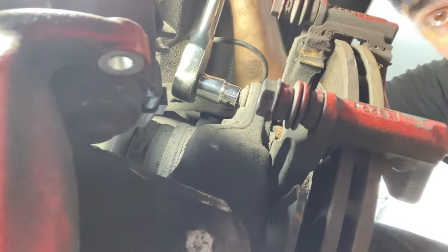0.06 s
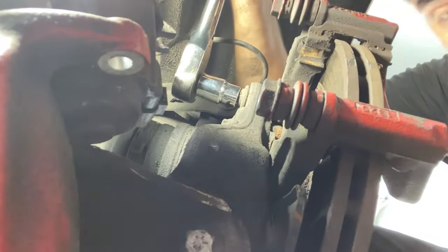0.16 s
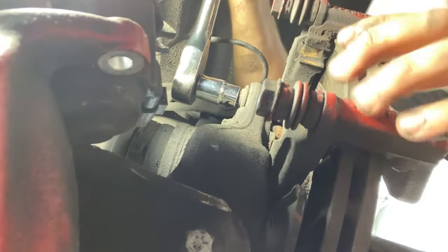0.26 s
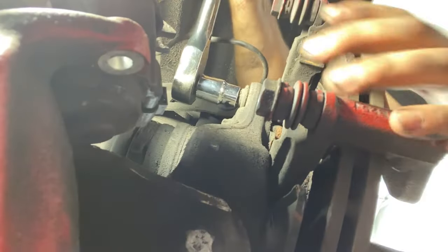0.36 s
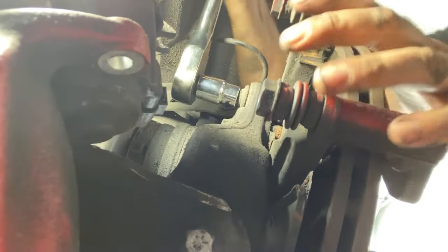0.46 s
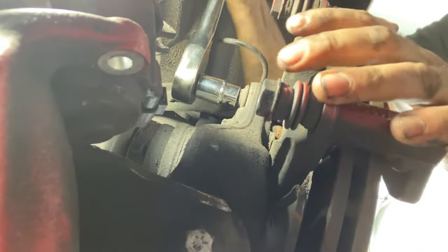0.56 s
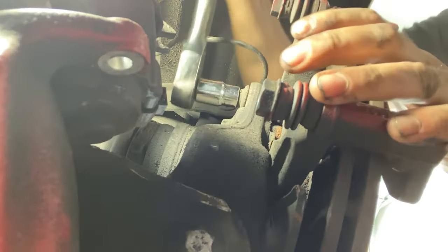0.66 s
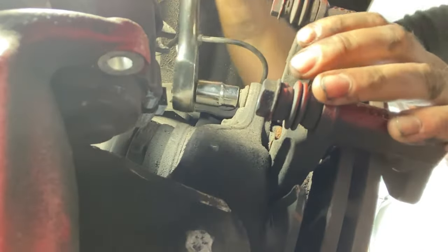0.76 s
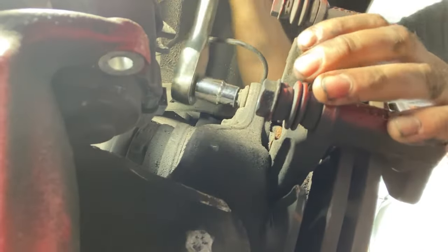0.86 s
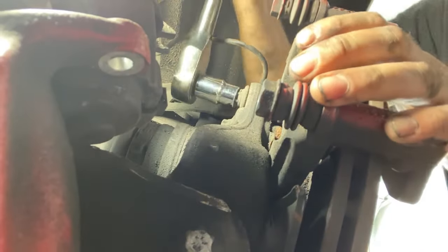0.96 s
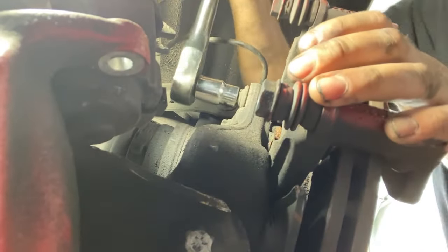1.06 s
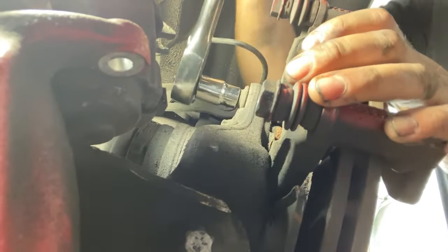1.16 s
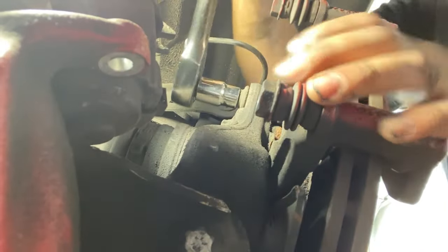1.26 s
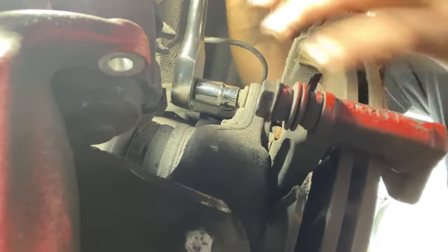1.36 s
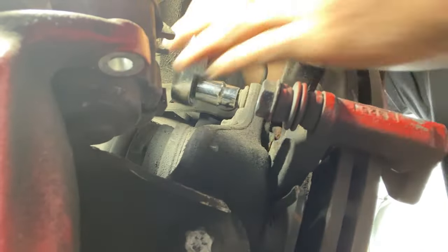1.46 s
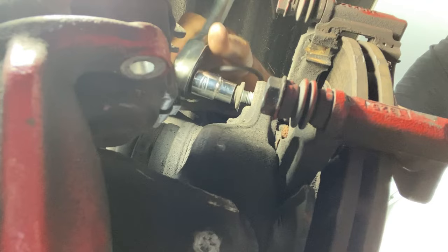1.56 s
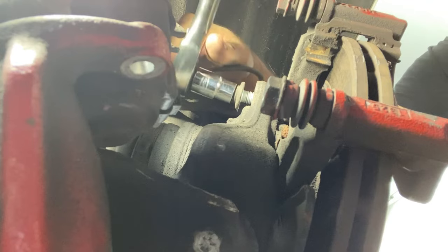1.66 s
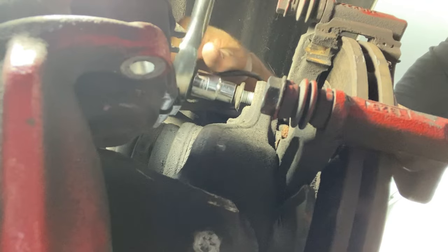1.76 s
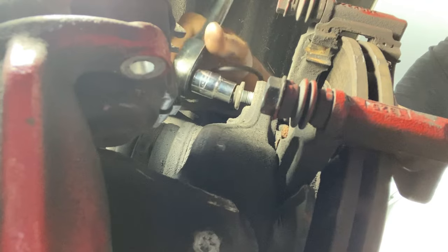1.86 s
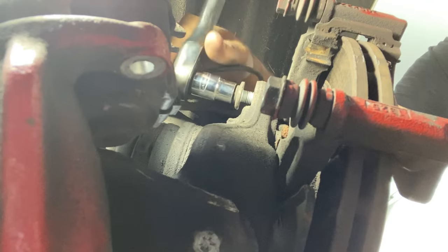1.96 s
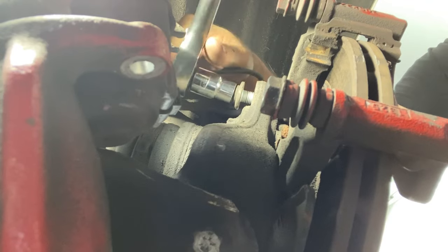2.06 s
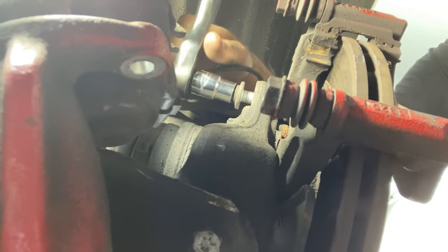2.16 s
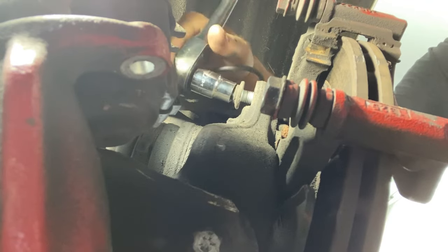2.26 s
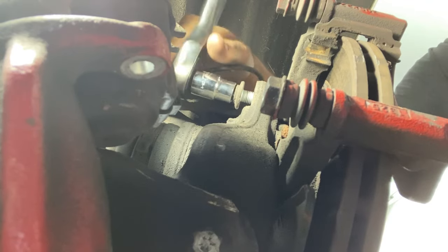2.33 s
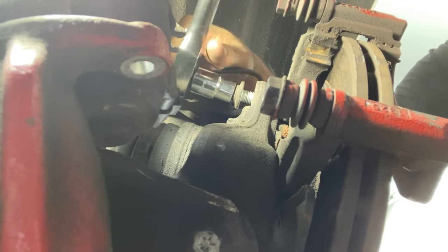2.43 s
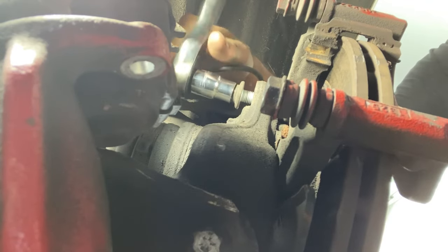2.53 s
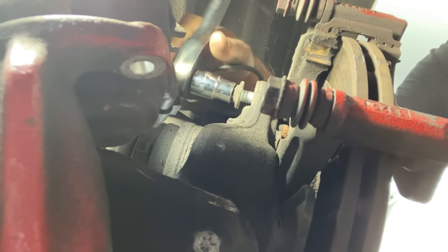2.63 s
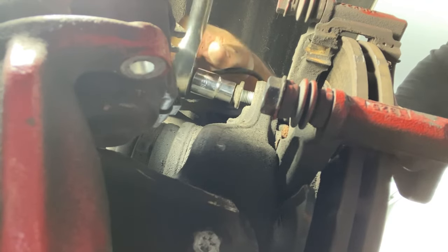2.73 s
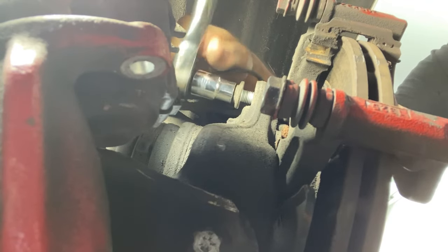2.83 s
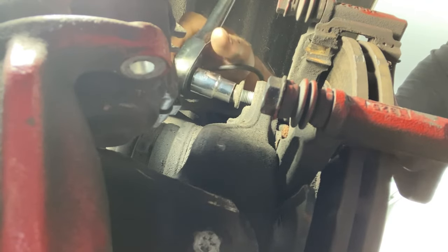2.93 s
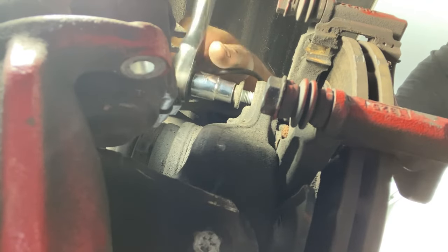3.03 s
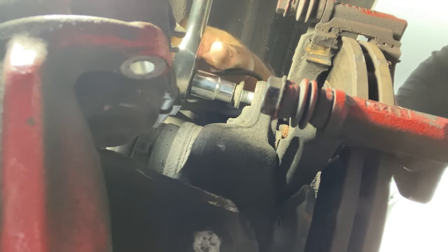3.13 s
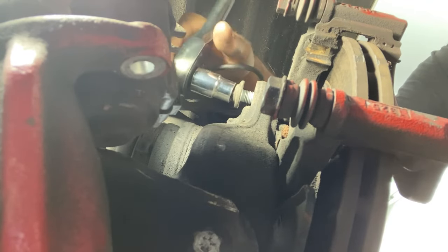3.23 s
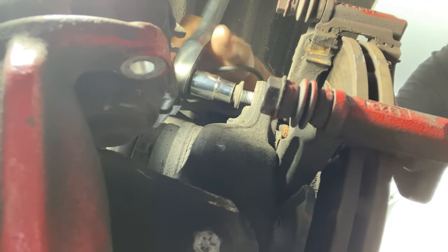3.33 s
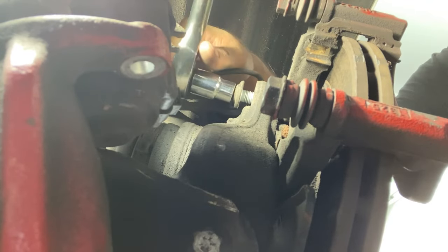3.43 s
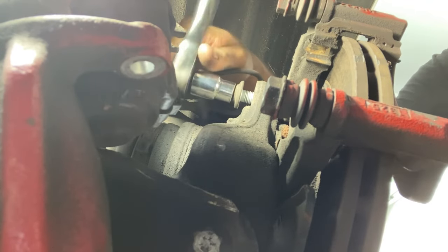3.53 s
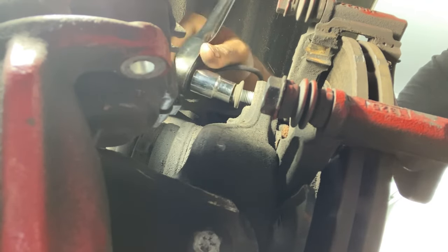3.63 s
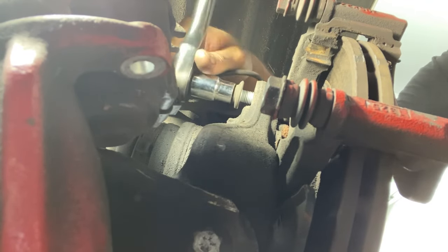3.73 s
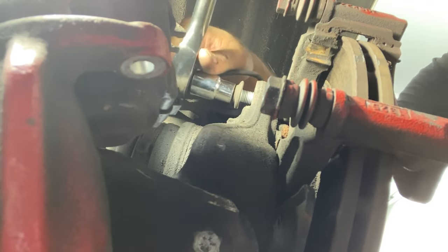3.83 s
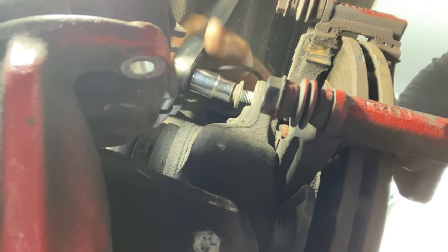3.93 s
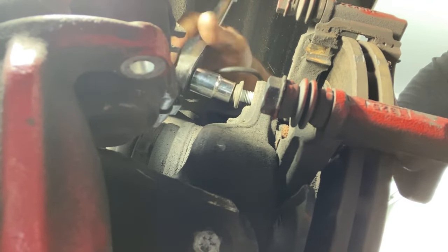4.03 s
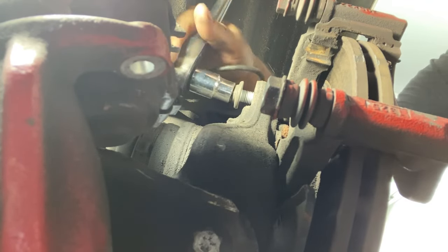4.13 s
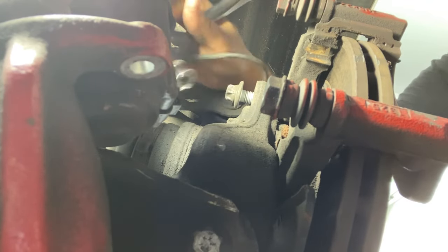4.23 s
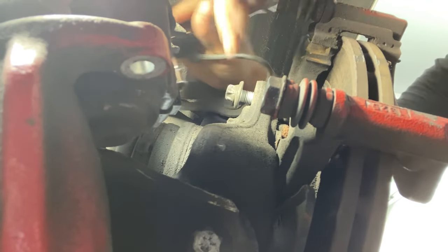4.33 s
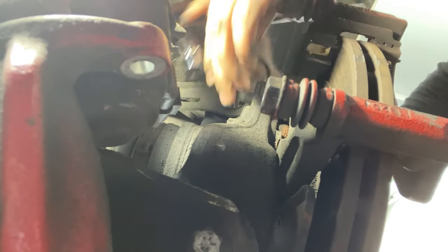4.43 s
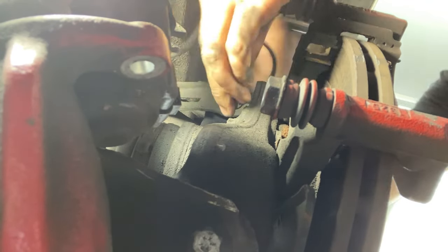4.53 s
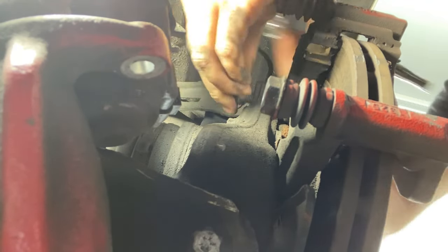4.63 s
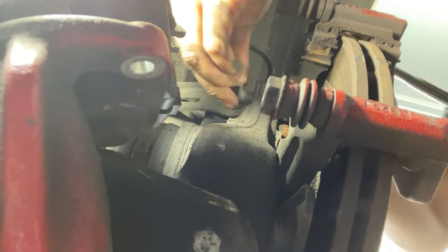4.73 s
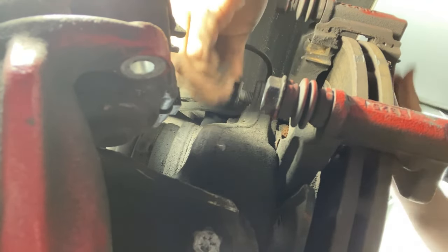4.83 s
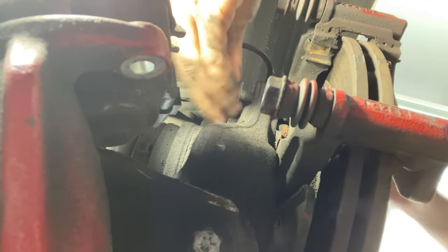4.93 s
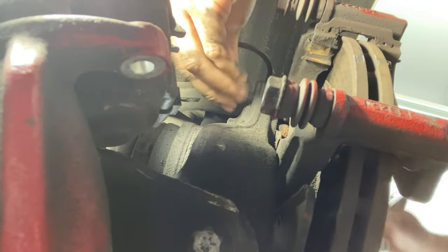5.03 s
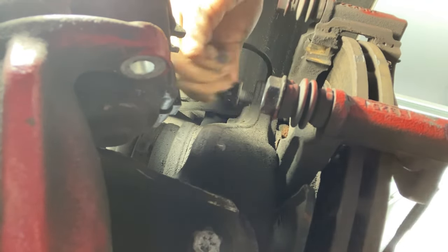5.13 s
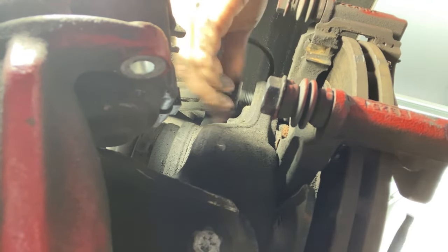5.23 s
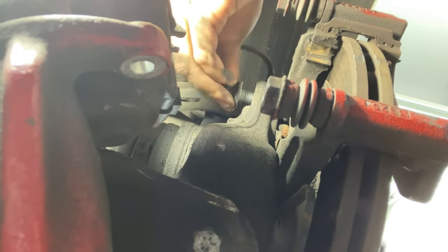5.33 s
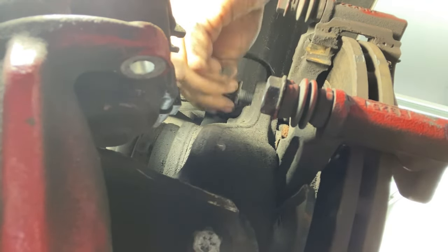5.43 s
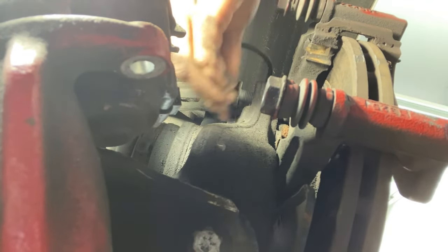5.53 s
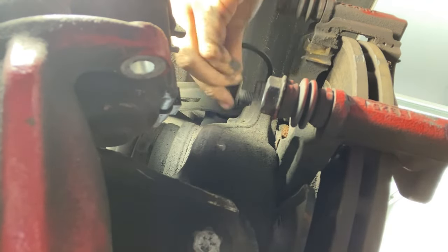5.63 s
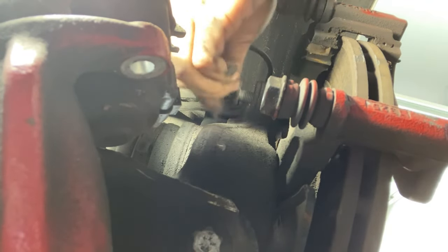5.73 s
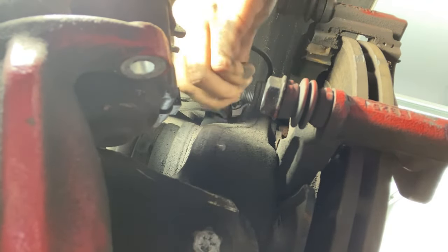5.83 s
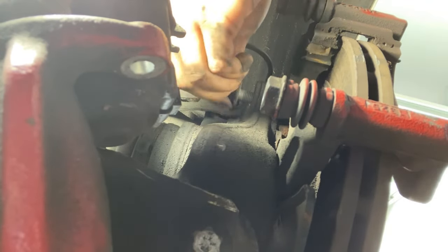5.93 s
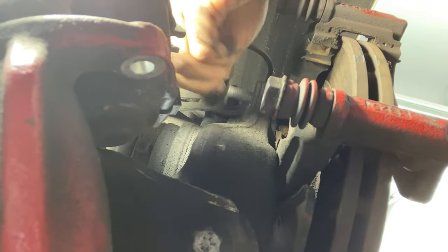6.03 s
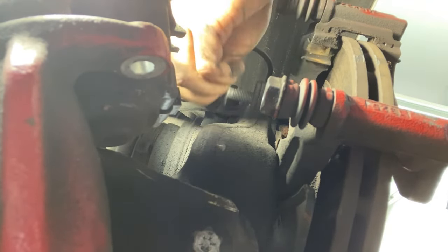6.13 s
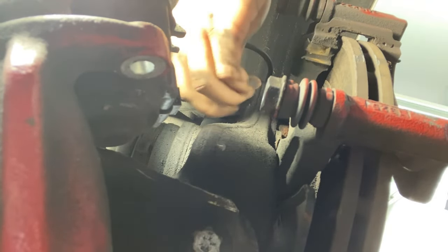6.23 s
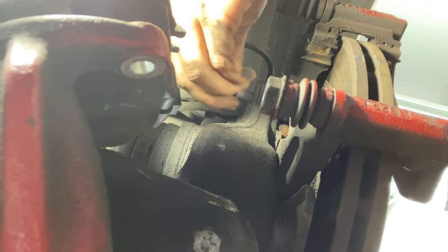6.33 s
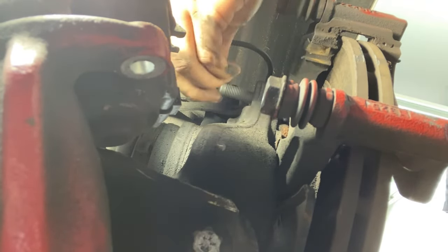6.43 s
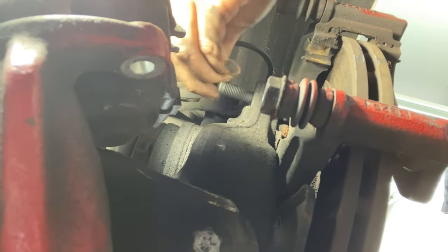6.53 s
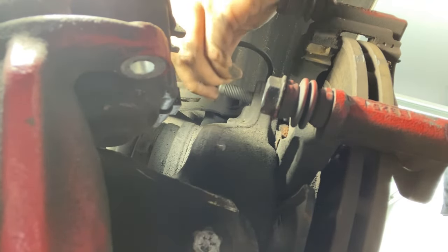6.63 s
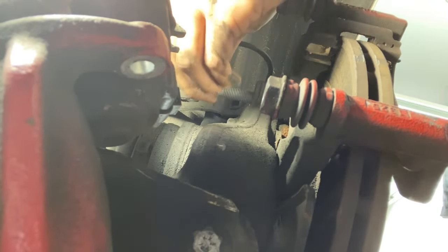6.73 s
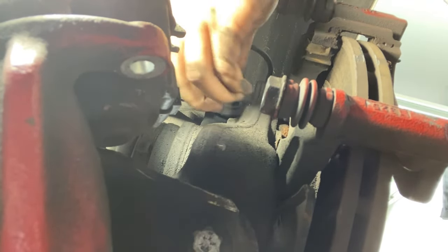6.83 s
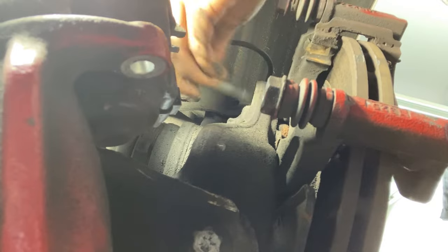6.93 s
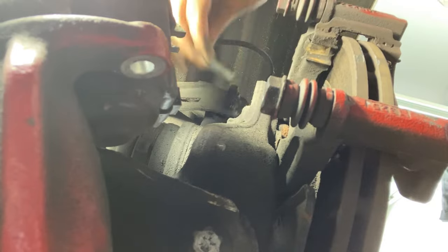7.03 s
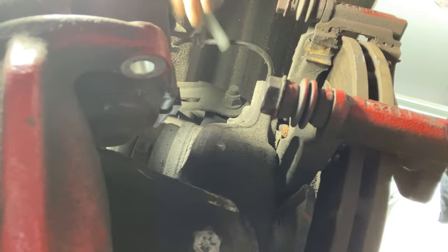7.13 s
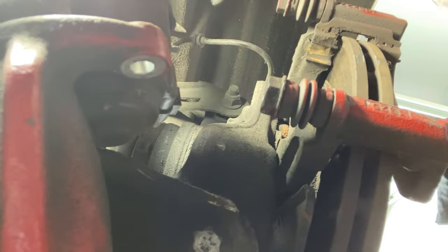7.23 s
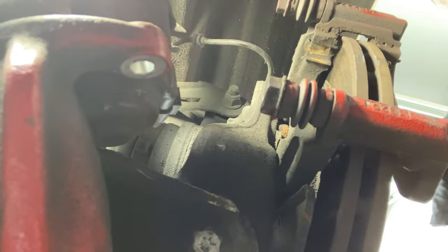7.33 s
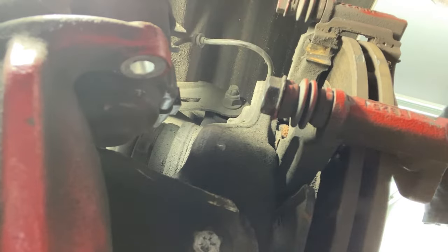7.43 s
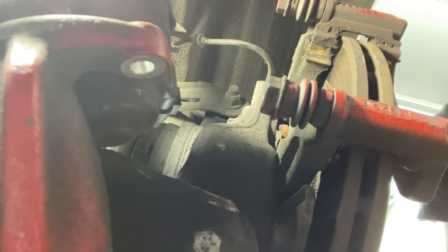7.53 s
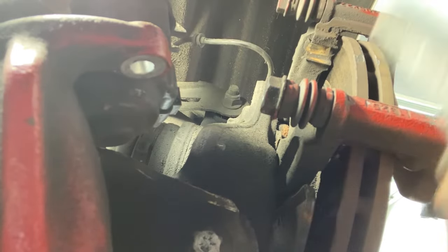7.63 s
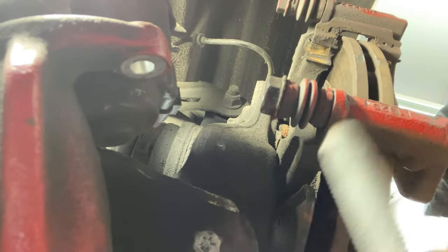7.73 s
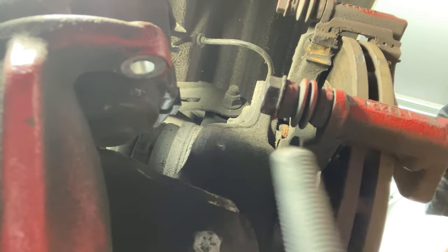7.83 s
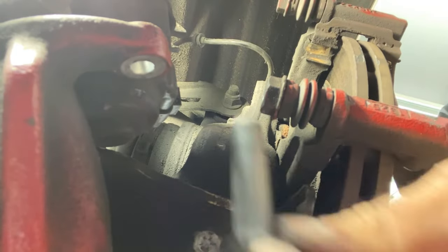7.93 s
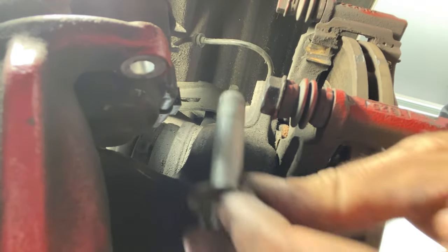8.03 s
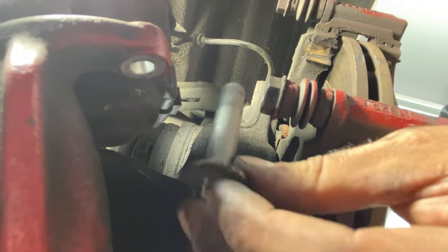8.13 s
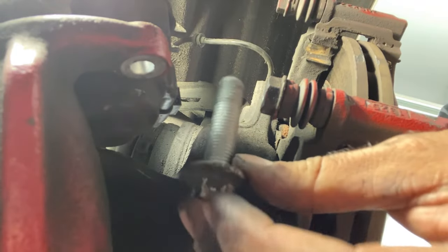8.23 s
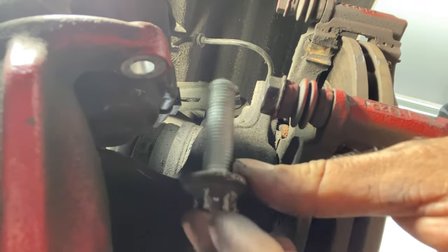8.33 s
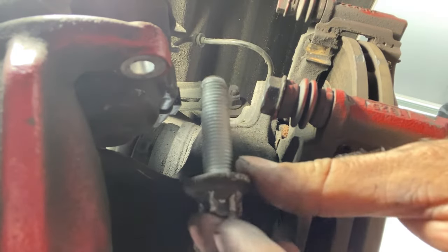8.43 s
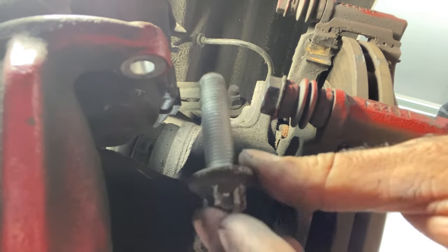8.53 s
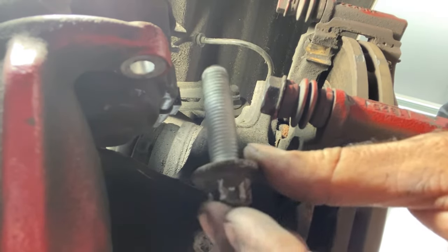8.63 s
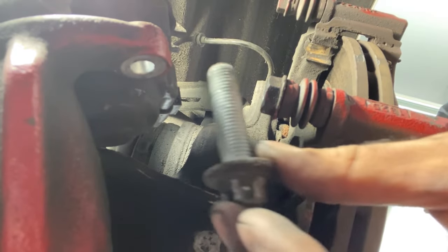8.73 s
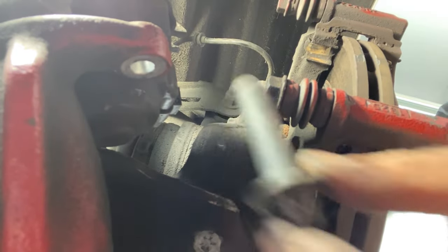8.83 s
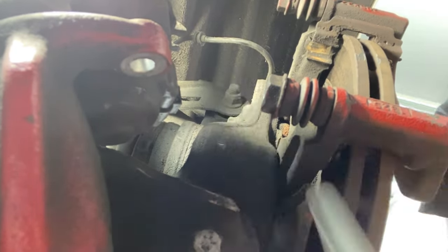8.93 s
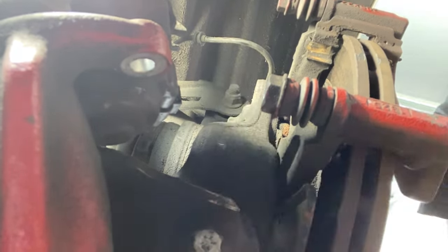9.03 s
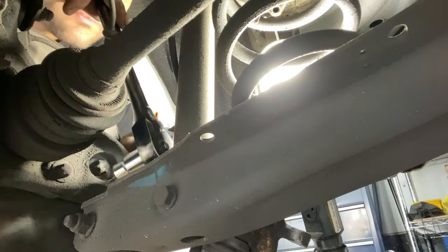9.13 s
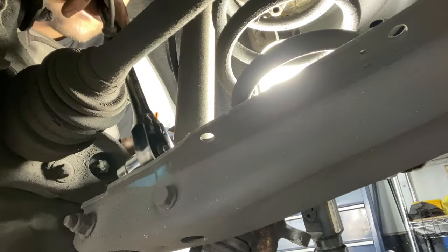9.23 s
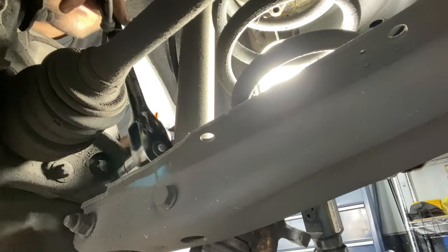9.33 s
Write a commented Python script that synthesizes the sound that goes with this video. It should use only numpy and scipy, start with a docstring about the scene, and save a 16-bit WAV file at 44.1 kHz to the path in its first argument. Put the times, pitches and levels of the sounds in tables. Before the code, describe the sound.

A hand ratchet clicks in short, fast bursts with loose metal knocks, then fingers wiggle a bolt free with small clinks in a garage.

```python
"""Ratchet and bolt in a garage

A hand ratchet backs a bolt out of a car's suspension, close to the microphone: each return swing
runs the pawl over a few teeth, and the loose socket knocks the hub around it. Fingers then wiggle the
bolt free with clinks. Bumps on bodywork and a housing, rubbing, rumble and hiss complete the scene.
Blows are noise bursts through ringing bodies; beds are coloured noise; deep panel modes are sines."""
import sys
import numpy as np
from scipy import signal
from scipy.fft import rfft, irfft, next_fast_len
from scipy.io import wavfile
from scipy.ndimage import uniform_filter1d

SR = 44100
rng = np.random.default_rng(int(sys.argv[2]) if len(sys.argv) > 2 else 0)


def dump_mix(stems):
    """Bounce the given channels to the path in sys.argv[1] as a 16-bit WAV at rate SR."""
    frames = np.atleast_2d(stems).T  # one column per channel
    limited = np.clip(frames, -1, 1)  # hard clip at full scale
    pcm = np.round(limited * 32767).astype(np.int16)
    wavfile.write(sys.argv[1], SR, pcm)


N = 414099

# Blow levels set each burst's energy, before the gain of its layer.
# return swings of the handle: (time [s], length [s], teeth passed [count], first click [dB],
# fade over the swing [dB], late slowing [0-1], mid-swing surge [0-1], socket knock [dB])
SWINGS = [(0.651, 0.055, 3, -3.5, 3.5, 0, 0, -44.5), (1.1232, .034, 2, -3, 4.5, 0, 0, -41.5),
          (1.5758, 0.075, 7, -4.5, 2, 0.14, 0.27, -36), (1.9403, 0.082, 7, -3.5, 1.5, .09, 0.22, -29),
          (2.2939, 0.078, 7, -4.5, 1, 0.11, 0.54, -35), (2.6343, 0.066, 6, -4.5, 4, .06, 0.27, -28),
          (2.970, .085, 6, -3.5, 6, .12, .23, -31.5), (3.3189, 0.088, 6, -3.5, 4, 0.12, 0.12, -33),
          (3.6764, 0.072, 3, -4, 4, 0.99, 0, -31)]
# single pawl clicks and light ticks of loose steel: (time [s], level [dB], brightness [dB per octave])
TICKS = [(.618, -27.5, -5.5), (.7758, -19, -9), (2.588, -22.5, -7), (2.7681, -22, -4.5),
         (3.9958, -33.5, -6), (4.146, -33.5, -4), (4.1669, -17, 0), (4.2263, -33, -5), (4.2862, -25.5, 1),
         (4.4686, -32.5, -5), (4.7704, -39.5, 1), (4.9057, -42.5, 8), (5.3033, -43, -1),
         (5.4615, -45.5, -2), (7.3148, -33.5, -5), (9.1613, -37, -6), (9.182, -37.5, -1.5)]
# tool or bolt knocking the hub: (time [s], level [dB], brightness [dB per octave])
KNOCKS = [(1.055, -20.5, -0.5), (1.342, -35.5, -4.5), (1.505, -28, -5.5), (1.694, -24, -4.5),
          (2.407, -26, -6), (3.179, -31, -4.5), (3.898, -35, -4), (3.989, -35.5, -5.5), (4.138, -33, 5.5),
          (4.423, -36, -7.5), (4.472, -37.5, -10), (5.224, -32.5, -0.5), (5.786, -32, 1.5),
          (6.744, -27, -3), (8.989, -38, -2), (9.018, -38.5, 5.5)]
# the freed bolt clinks in its hole and jolts the hub:
# (time [s], clink level [dB], clink brightness [dB per octave], hub knock level [dB])
CLINKS = [(5.985, -18, 10.5, -35), (5.9959, -14, 2.5, -25), (6.1672, -22, 1.5, -28),
          (6.1986, -29.5, 2, -28), (6.3262, -37, 11, -34.5), (6.3703, -31, -1.5, -36.5),
          (6.8244, -22, 0.5, -36), (6.8405, -25.5, -1.5, -48), (6.8745, -23, 1.5, -29)]
# the bolt's thread scuffs in its hole: (time [s], level [dB], contact decay [s], brightness [dB per octave])
SCUFFS = [(.567, -32.5, 0.037, -0.5), (1.047, -24, 0.0063, 3), (1.285, -34.5, .015, -0.5),
          (4.375, -39.5, 0.023, 6), (5.062, -40, 0.013, -3), (5.22, -30, 0.0047, -0.5),
          (5.352, -37.5, 0.016, -3.5), (5.585, -31.5, 0.045, -3), (5.79, -35.5, .0085, .5),
          (5.905, -40.5, 0.0306, -2.5), (6.145, -33, 0.016, -1), (6.345, -32, .0083, 5),
          (6.755, -32.5, 0.038, -2), (6.855, -29.5, 0.018, 5)]
# dull bumps on the bodywork: (time [s], level [dB], contact decay [s], brightness [dB per octave])
BUMPS = [(.789, -17, 0.017, -1.5), (1.056, -23, 0.0083, 1), (7.945, -39.5, 0.0038, -16)]
# fingers bump a housing: (time [s], level [dB], contact decay [s], brightness [dB per octave])
GRIPS = [(8.791, -25, 0.014, -1.5), (8.797, -14.5, 0.0023, 0), (8.812, -33.5, .02, 0),
         (8.838, -28.5, 0.0026, -1)]
# shoves that rock the panel: (time [s], level [dB], swell time [s])
SHOVES = [(0.791, -8.5, 0.19), (3.191, -41, 0.034), (3.911, -42, 0.028), (6.438, -39, 0.043),
          (6.968, -38.5, 0.025)]

# resonances of the ratchet head: (frequency [Hz], width [Hz], level [dB])
RATCHET_MODES = [(2498, 120, -12.5), (2996, 39, -4.5), (3310, 41, -5), (4665, 350, -10.5), (5300, 72, -11),
                 (6310, 380, -4), (6647, 73, 0.5), (7870, 420, -8), (8544, 300, 1), (8907, 210, -11.5),
                 (9270, 210, 3.5), (9810, 400, -3.5), (11740, 450, -3), (11800, 265, -16.5),
                 (14640, 170, -6)]
# broad snap of the ratchet: (frequency [Hz], level [dB])
RATCHET_SNAP = [(100, -27.5), (400, -29.5), (1200, -24), (4000, -13.5), (8000, -16), (11000, -12.5),
                (13500, -22), (16000, -31.5)]
# resonances of the hub and suspension arm: (frequency [Hz], width [Hz], level [dB])
HUB_MODES = [(278.1, 7.8, 1), (494.3, 8.4, -2), (672, 15, 4), (804, 15, 7), (874, 4, 8.5), (974, 20, 1.5),
             (1140.6, 23, 1.5), (1340, 160, -0.5), (1435, 97, -4), (1625, 16, 6), (2140, 45, -2.5),
             (2644, 56, -9)]
# broad knock of the hub: (frequency [Hz], level [dB])
HUB_KNOCK = [(60, -23.5), (250, -7.5), (600, -17.5), (1300, -14), (2800, -5.5), (5000, -13.5),
             (9000, -26.5), (16000, -41.5)]
# broad rasp of the thread: (frequency [Hz], level [dB])
THREAD_RASP = [(100, -21), (500, -16), (1000, 5.5), (1800, -2), (3200, -6.5), (5000, -16), (9000, -24.5),
               (16000, -36)]
# resonances of the bolt and of the arm that holds it: (frequency [Hz], width [Hz], level [dB])
BOLT_MODES = [(779, 6.5, 13), (880, 7.2, 12), (1650, 18, 12), (2360, 56, -11), (3370, 41, -11),
              (3780, 44, 2), (4390, 85, 7.5), (4630, 67, -11), (4863, 77, 10), (5860, 110, 5.5),
              (6420, 44, 1), (7120, 102, 0), (8300, 170, -9), (11200, 460, -9)]
# broad clink of the bolt: (frequency [Hz], level [dB])
BOLT_CLINK = [(200, -20), (1000, -8), (3000, -7), (6000, -9), (9000, -19), (13000, -24), (16000, -36)]
# resonances of the bodywork: (frequency [Hz], width [Hz], level [dB])
PANEL_MODES = [(125, 20, 5), (194.6, 12, -0.5), (264, 10, 5.5), (502, 24, -0.5), (683, 90, -4),
               (805, 44, -3.5)]
# broad thud of the bodywork: (frequency [Hz], level [dB])
PANEL_THUD = [(25, -21.5), (60, -12.5), (150, -5), (300, -2.5), (400, -8), (850, -8.5), (1200, -20),
              (4000, -25.5), (9000, -30), (16000, -50)]
# resonances of the housing: (frequency [Hz], width [Hz], level [dB])
HOUSING_MODES = [(208, 40, 6.5), (290, 50, 8), (407, 57, 0), (1690, 103, 1.5), (2060, 64, -14),
                 (3250, 146, 2.5), (5200, 360, -19), (9300, 360, 3), (11600, 180, -8)]
# broad tap on the housing: (frequency [Hz], level [dB])
HOUSING_TAP = [(25, 0), (70, 5), (300, 0), (600, -7), (1600, -4), (4000, -9), (9000, -12), (13000, -20),
               (16000, -34)]
# deep panel modes: (frequency [Hz], level [dB], t60 [s])
BOOM_MODES = [(54.5, 0, .8), (64.5, -1, .75)]

# how hard the hands rub over tool and car, before RUB_DB: (time [s], level [dB])
RUB = [(0.0, -60), (0.55, -58.5), (0.91, -53), (3.89, -59), (4.18, -61.5), (5.07, -63), (5.96, -59.5),
       (6.2, -60), (8.13, -65), (8.76, -64.5), (8.92, -60), (9.39, -61)]
# tone of the rubbing: (frequency [Hz], level [dB])
RUB_COLOUR = [(80, -12.5), (170, 3), (300, -0.5), (600, -5), (1200, -9.5), (3000, -18), (8000, -27.5),
              (16000, -35.5)]
# fingers brush over the housing: (time [s], level [dB])
BRUSHES = [(8.81, -34), (8.925, -45.5), (9.0, -44.5)]
# tone of the finger brushes: (frequency [Hz], level [dB])
FINGER_COLOUR = [(60, 5), (200, -4), (600, -4), (2000, -2.5), (5000, -11.5), (9000, -6.5), (14000, -16.5),
                 (16000, -33)]
# low rumble of the garage and the rocking car, before RUMBLE_DB: (time [s], level [dB])
RUMBLE = [(0.0, -55), (0.63, -55.5), (0.83, -49), (0.99, -38.5), (1.54, -51), (5.88, -57), (6.72, -50.5),
          (8.42, -58.5), (9.07, -51.5), (9.39, -57.5)]
# tone of the rumble: (frequency [Hz], level [dB])
RUMBLE_COLOUR = [(15, -20), (35, -17.5), (56, 0.5), (80, 1.5), (105, 3), (150, -7), (250, -25.5),
                 (600, -59.5)]
# faint hiss: (time [s], level [dB])
AIR = [(0, -60), (.6, -53), (1.3, -66.5), (4.3, -62.5), (4.7, -69), (6.6, -70), (7.4, -56), (8.3, -66.5),
       (9.39, -64.5)]
# tone of the hiss: (frequency [Hz], level [dB])
AIR_COLOUR = [(100, -12.5), (230, -4), (330, -16.5), (700, -9.5), (1500, -16.5), (3200, -16.5), (5000, -21),
              (8500, -24), (11000, -27.5), (13500, -39.5), (15000, -54), (16000, -70)]

# how long the garage rings, before the limits in garage(): (frequency [Hz], t60 [s])
ROOM_T60 = [(100, 0.4), (800, 0.22), (3000, 0.078), (8000, 0.57), (15000, 0.16)]
# strength of its echo: (frequency [Hz], level [dB])
ROOM_DB = [(100, -2.5), (800, -6), (3000, -6), (6500, -20.5), (9000, -24.5), (15000, -26)]
# how alike the two microphone ports hear: (frequency [Hz], likeness [0-1])
LIKENESS = [(60, .98), (125, .65), (250, .2), (500, 0), (5000, .1), (6300, .7), (7700, .96), (15000, .94)]
# phase between the ports: (frequency [Hz], left lead [radians])
LEAD = [(3000, 0), (6000, -1.3), (7400, -.6), (8000, 0), (9300, 1.7), (10450, 3.14), (11800, 4.7),
        (13000, 6.2), (13700, 6.6), (15200, 9.3)]
# balance of the ports: (frequency [Hz], left minus right [dB])
BALANCE_DB = [(125, 0.5), (300, -1), (700, -4), (1200, 0), (3000, -0.5), (4600, -0.5), (6500, -3),
              (8000, 0)]

SKIM_DB, TOOTH_SPREAD_DB = 6, 1.78  # the pawl skims the teeth in a surge; no two teeth are alike
# the socket lets go before a swing, bites after it, then settles (levels relative to the bite)
RELEASE_S, BITE_S, SETTLE_S = 0.047, 0.065, 0.13
RELEASE_DB, SETTLE_DB = -5, -5.5
PLAY_CONTACT_S, BITE_DB_PER_OCTAVE, LOOSE_DB_PER_OCTAVE = 0.009, -1.5, -5.5
TICK_CONTACT_S, KNOCK_CONTACT_S, CLINK_CONTACT_S = 0.0042, 0.0075, 0.005
JOLT_CONTACT_S, JOLT_DB_PER_OCTAVE = 0.014, -0.5
# random rattles while the hands work, at a level above the RUB curve
WORK_START_S, WORK_END_S = 1.2, 7.0
RATTLE_DB, RATTLE_SPREAD_DB, RATTLE_CONTACT_S = 11.5, 3.5, 0.006
RUB_DB, RUMBLE_DB = 3, 2.5
# each swing adds a swell of rubbing, lagging its start
SWING_RUB_DB, SWING_RUB_LAG_S, SWING_RUB_RISE_S, SWING_RUB_FALL_S = -51.5, 0.025, 0.047, 0.11
BRUSH_RISE_S, BRUSH_FALL_S = 0.017, 0.034
EDGE_HZ = 15900


def ratchet(coupling_db=-15, contact_s=0.0019, shade_db=1.16):
    """Sharp pawl clicks that reach the hub, plus single clicks of the pawl and light ticks of loose steel."""
    coupled_hub = [(hz, width, db + coupling_db) for hz, width, db in HUB_MODES]  # through the socket
    # each tooth is a little brighter or duller
    teeth = [(s, db, contact_s, shade_db * rng.standard_normal()) for s, db in pawl_drops()]
    clicks = strikes(teeth, list(RATCHET_MODES) + coupled_hub, RATCHET_SNAP, gain_db=15.5, rise_s=0.0006,
                     scatter_db=-6.5, scatter_s=0.0072, vary_db=3.0, lead_in_db=-7.0)
    singles = [(s, db, TICK_CONTACT_S, bright_db) for s, db, bright_db in TICKS]
    ticks = strikes(singles, RATCHET_MODES, RATCHET_SNAP, gain_db=14.5, rise_s=0.00078,
                    scatter_db=-21, scatter_s=0.021, vary_db=1)
    return clicks + ticks


def pawl_drops():
    """Times and levels of the teeth: clicks crowd in a mid-swing surge, spread out late and fade."""
    drops = []
    for start, length, teeth, db, fade_db, slowing, surge, _ in SWINGS:
        u = np.linspace(0, 1, round(teeth))  # progress through the swing
        arch = u * (1 - u)
        times = start + length * (u - slowing * arch + surge * arch * (1 - 2 * u))
        skim = SKIM_DB * surge * np.sin(np.pi * u)
        spread = TOOTH_SPREAD_DB * rng.standard_normal(len(u))
        drops += zip(times, db - fade_db * u - skim + spread)
    return drops


def suspension():
    """Knocks and rattles that ring the hub, slower scuffs of the thread, and the bolt's brighter clinks."""
    blows = [(s, db, KNOCK_CONTACT_S, bright_db) for s, db, bright_db in KNOCKS]
    jolts = [(s, hub_db, JOLT_CONTACT_S, JOLT_DB_PER_OCTAVE) for s, _, _, hub_db in CLINKS]
    steel = [(s, db, CLINK_CONTACT_S, bright_db) for s, db, bright_db, _ in CLINKS]
    hub_blows = blows + jolts + socket_play() + rattles()
    knocks = strikes(hub_blows, HUB_MODES, HUB_KNOCK, gain_db=21.5, rise_s=0.002,
                     scatter_db=-20.0, scatter_s=0.024, vary_db=3.5, lead_in_db=-27)
    scuffs = strikes(SCUFFS, HUB_MODES, THREAD_RASP, gain_db=20, rise_s=0.02,
                     scatter_db=-31.0, scatter_s=0.04, vary_db=0.5, lead_in_db=-34.5, lumpy_db=-0.5)
    clinks = strikes(steel, BOLT_MODES, BOLT_CLINK, gain_db=19.5, rise_s=0.0036,
                     scatter_db=-15, scatter_s=0.013, vary_db=4.0)
    return knocks + scuffs + clinks


def socket_play():
    """Three knocks go with every swing, as the socket lets go, bites again and settles."""
    rows = []
    for start, length, *_, db in SWINGS:
        end = start + length
        rows += [(start - RELEASE_S, db + RELEASE_DB, PLAY_CONTACT_S, LOOSE_DB_PER_OCTAVE),
                 (end + BITE_S, db, PLAY_CONTACT_S, BITE_DB_PER_OCTAVE),
                 (end + SETTLE_S, db + SETTLE_DB, PLAY_CONTACT_S, LOOSE_DB_PER_OCTAVE)]
    return rows


def rattles(count=30):
    """Loose parts stir at random, following the rubbing level, some dull and some bright."""
    rows, step_s = [], (WORK_END_S - WORK_START_S) / count
    for k in range(count):
        s = WORK_START_S + (k + rng.random()) * step_s
        rub_db = np.interp(s, *np.transpose(RUB))
        db = rub_db + RATTLE_DB + RATTLE_SPREAD_DB * rng.standard_normal()
        rows.append((s, db, RATTLE_CONTACT_S, rng.uniform(-2.002, 3.7)))
    return rows


def bodywork():
    """Dull bumps ring the car's panels, and finger bumps ring a housing."""
    bumps = strikes(BUMPS, PANEL_MODES, PANEL_THUD, gain_db=26.5, rise_s=0.002,
                    scatter_db=-19.0, scatter_s=0.036, vary_db=2.0)
    grips = strikes(GRIPS, HOUSING_MODES, HOUSING_TAP, gain_db=19, rise_s=0.0015,
                    scatter_db=-21, scatter_s=0.016, vary_db=1.5)
    return bumps + grips


def boom():
    """After each shove two deep panel modes swell and beat against each other."""
    t, out = np.arange(SR) / SR, np.zeros(N + SR)
    ring = np.zeros(SR)
    for k, (hz, db, t60) in enumerate(BOOM_MODES):
        polarity = (-1) ** k  # the modes start in opposite directions
        ring += polarity * amp(db - 60 * t / t60) * np.sin(2 * np.pi * hz * t)
    for s, db, swell_s in SHOVES:
        out[round(s * SR):][:SR] += amp(db) * ring * (1 - np.exp(-t / swell_s))
    return out[:N]


def strikes(rows, modes, broad, gain_db, rise_s, scatter_db, scatter_s, vary_db,
            lead_in_db=-22, lumpy_db=3, size=16384):
    """Each blow is a brief chatter of contacts, scattered by nearby parts, that rings the modes of one body."""
    lead = size // 64  # room for a soft lead-in before the blow
    t, hz = (np.arange(size) - lead) / SR, np.fft.rfftfreq(size, 1 / SR)
    after = np.maximum(t, 0)
    lead_in = amp(lead_in_db) * np.exp(-abs(t) / 0.0056)
    centre, width, mode_db = np.transpose(modes)[:, :, None]
    peaks = amp(mode_db) ** 2 / (1 + (2 * (hz - centre) / width) ** 2)
    peaks = peaks / (1 + ((hz - centre) / (10 * width)) ** 2)  # skirts fall away faster far from the centre
    broad_power = amp(read(broad, hz)) ** 2
    octaves = np.log2(np.maximum(hz, broad[1][0]) / centre.mean())  # the tilt stops in the bass
    out = np.zeros((2, N + 2 * size))
    for s, db, contact_s, bright_db in rows:
        share = amp(vary_db * rng.standard_normal(len(modes))) ** 2  # no two blows land on the same spot
        body = causal(np.sqrt(share @ peaks + broad_power) * amp(bright_db * octaves))
        force = np.exp(-after / max(contact_s, 1e-4)) + amp(scatter_db) * np.exp(-after / scatter_s)
        force *= 1 - np.exp(-after / rise_s)
        lumps = unit(uniform_filter1d(rng.standard_normal(size), size // 256))
        envelope = amp(lumpy_db * lumps) * (lead_in * rng.random() ** 2 + force)
        chatter = rng.standard_normal((2, size)) * envelope
        ring = irfft(rfft(chatter) * body)
        ring /= np.linalg.norm(ring, axis=1, keepdims=True)
        out[:, round(s * SR):][:, :size] += amp(db + gain_db) * ring
    return out[:, lead:][:, :N]


def causal(gain):
    """The minimum-phase response with this magnitude: it rings only after the blow."""
    log_gain = np.log(np.maximum(gain, 1e-5))
    circle = np.concatenate([log_gain, log_gain[-2:0:-1]])
    return np.exp(np.conj(signal.hilbert(circle)))[:len(gain)]


def background():
    """Rubbing hands and brushing fingers over the rumble and air of the garage."""
    swing_peaks = [(s + SWING_RUB_LAG_S, SWING_RUB_DB) for s, *_ in SWINGS]
    swing_rub = swells(swing_peaks, SWING_RUB_RISE_S, SWING_RUB_FALL_S)
    hands = (amp(RUB_DB) * level(RUB) + swing_rub) * noise(RUB_COLOUR, grain_db=2.0)
    fingers = swells(BRUSHES, BRUSH_RISE_S, BRUSH_FALL_S) * noise(FINGER_COLOUR, grain_db=3.5)
    rumble = amp(RUMBLE_DB) * level(RUMBLE) * noise(RUMBLE_COLOUR, grain_db=0.73, size=6000)
    air = level(AIR) * noise(AIR_COLOUR, grain_db=2.7, size=2000)
    return hands + fingers + rumble + air


def noise(colour, grain_db=0, size=300):
    """Two channels of coloured noise whose level flickers together in grains of about size samples."""
    flicker = unit(uniform_filter1d(rng.standard_normal(N), size))
    white = rng.standard_normal((2, N)) * amp(grain_db * flicker)
    n = next_fast_len(N)
    tone = amp(read(colour, np.fft.rfftfreq(n, 1 / SR)))
    return unit(irfft(rfft(white, n) * tone, n)[:, :N])


def swells(rows, rise_s, fall_s):
    """A gain for every sample that rises to each (time [s], level [dB]) peak and dies away after it."""
    t = np.arange(N) / SR
    return sum(amp(db) * np.exp(-np.maximum((s - t) / rise_s, (t - s) / fall_s)) for s, db in rows)


def level(curve):
    """A (time [s], level [dB]) curve as a gain for every sample."""
    return amp(np.interp(np.arange(N) / SR, *np.transpose(curve)))


def garage(x, build_s=0.0049, size=256):
    """A diffuse echo that builds quickly and dies at its own speed in each band."""
    hz, t, z = signal.stft(rng.standard_normal((2, SR)), SR, nperseg=size)
    t60 = np.clip(read(ROOM_T60, hz), 0.15, 1.2)[:, None]
    fade = amp(-60 * t / t60) * (1 - np.exp(-t / build_s))
    # even out the energy of the bands, then set their strength
    fade *= amp(read(ROOM_DB, hz))[:, None] / np.sqrt(SR * np.mean(fade ** 2, axis=1, keepdims=True))
    echo = signal.istft(z * fade, SR, nperseg=size)[1]
    return signal.fftconvolve(x, echo, axes=1)[:, :N]


def ports(x):
    """Two ports hear the bass alike, the middle unrelated, and the treble alike but shifted in phase."""
    n = next_fast_len(N + SR // 10)
    hz, (a, b) = np.fft.rfftfreq(n, 1 / SR), rfft(x, n)
    same = np.clip(read(LIKENESS, hz), -1, 1)
    lean = amp(read(BALANCE_DB, hz) / 2)
    right = (same * a + np.sqrt(1 - same ** 2) * b) * np.exp(-1j * read(LEAD, hz))
    return irfft(np.array([a * lean, right / lean]), n)[:, :N]


def amp(db):
    """Decibels to gain."""
    return 10 ** (np.asarray(db) / 20)


def unit(x):
    """Scales to rms 1."""
    return x / np.sqrt(np.mean(x ** 2) + 1e-20)


def read(points, hz):
    """Reads a spectrum table on a log-frequency axis."""
    f, value = np.transpose(points)
    return np.interp(np.log(hz + 1), np.log(f + 1), value)


def scene():
    """All blows with their echo, over the background, plus the deep boom equally in both channels."""
    blows = ratchet() + suspension() + bodywork()
    return ports(blows + garage(blows) + background()) + boom()


def record(dry):
    """Peaks round off softly below full scale; then a low-pass limits the treble."""
    low_pass = signal.firwin(255, EDGE_HZ, window=("kaiser", 9), fs=SR)
    rounded = dry / (1 + (dry / 0.95) ** 6) ** (1 / 6)
    return signal.oaconvolve(rounded, low_pass[None], "same", axes=1)


dry = scene()
out = record(dry)
dump_mix(out)
```